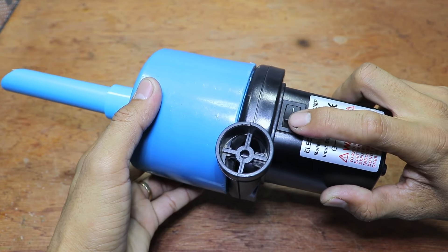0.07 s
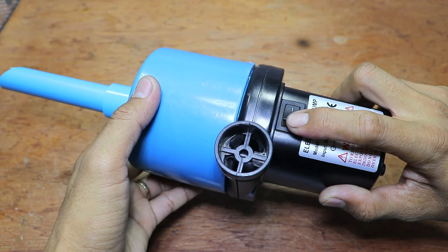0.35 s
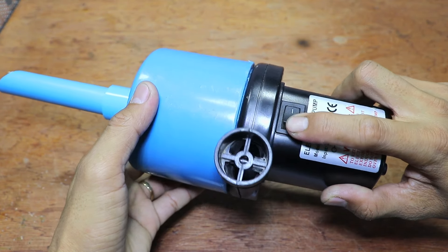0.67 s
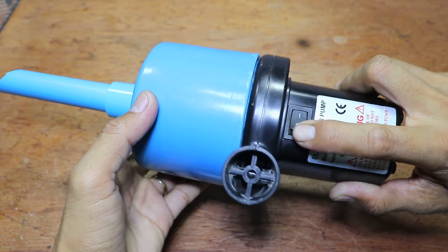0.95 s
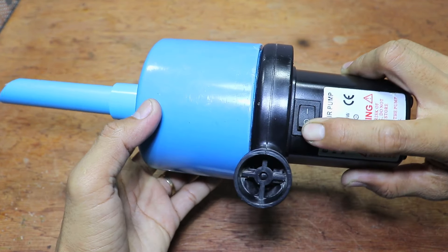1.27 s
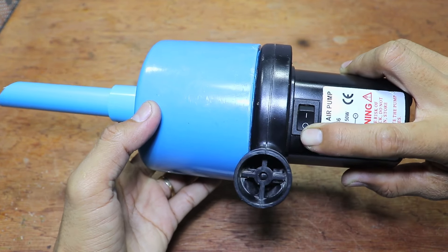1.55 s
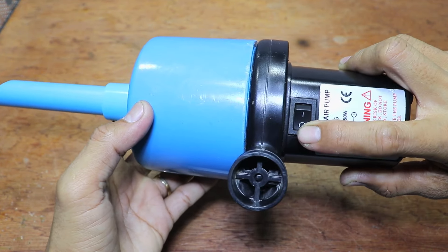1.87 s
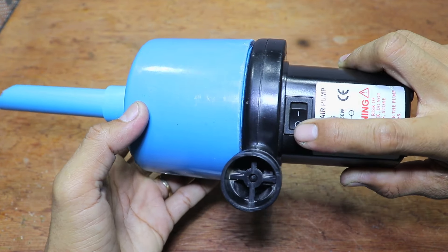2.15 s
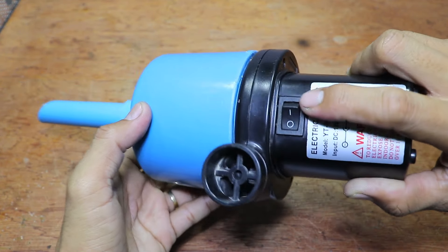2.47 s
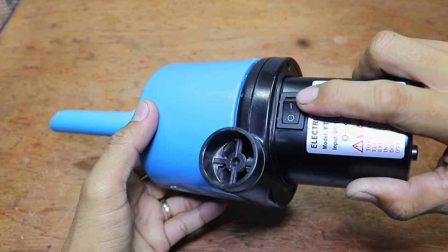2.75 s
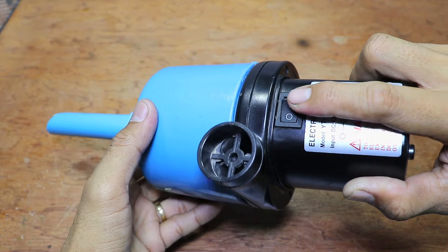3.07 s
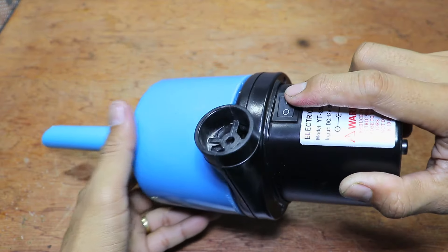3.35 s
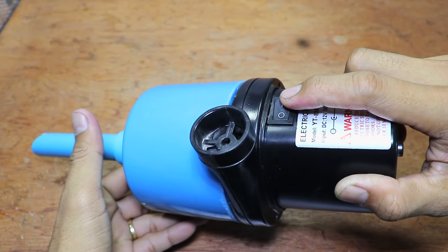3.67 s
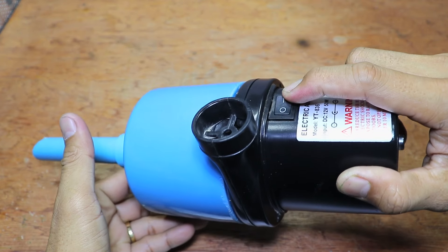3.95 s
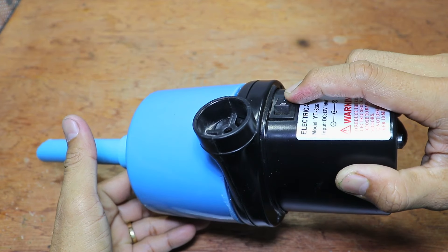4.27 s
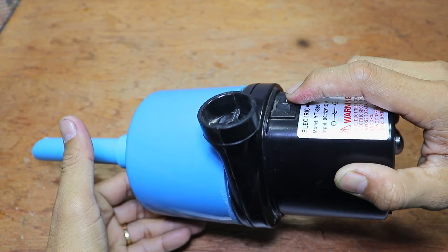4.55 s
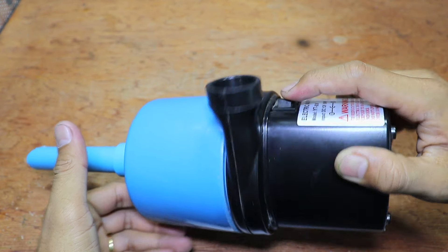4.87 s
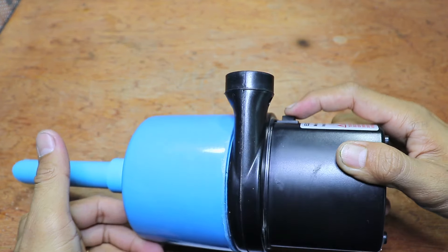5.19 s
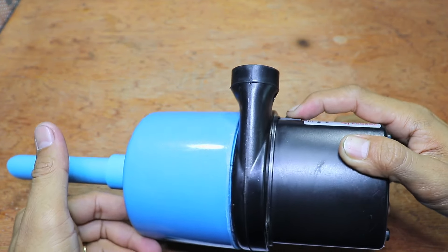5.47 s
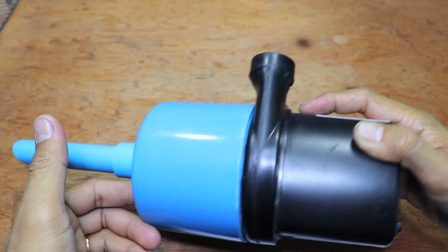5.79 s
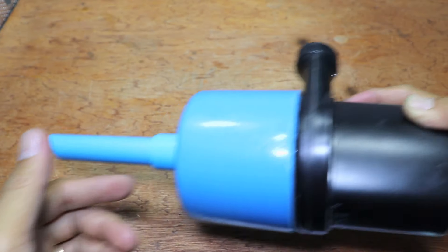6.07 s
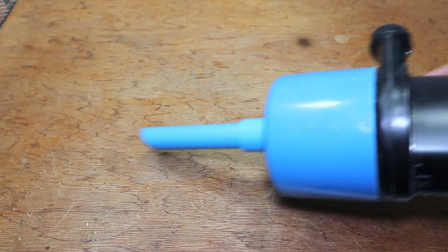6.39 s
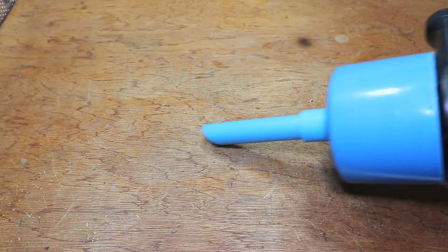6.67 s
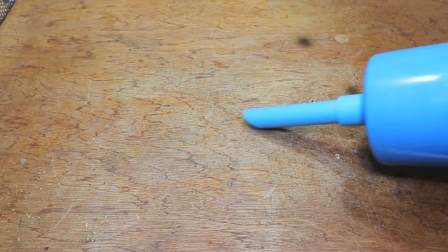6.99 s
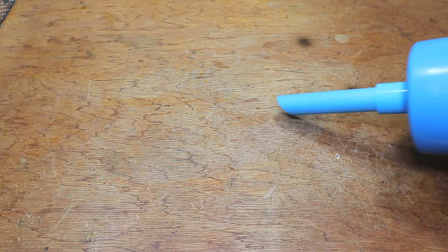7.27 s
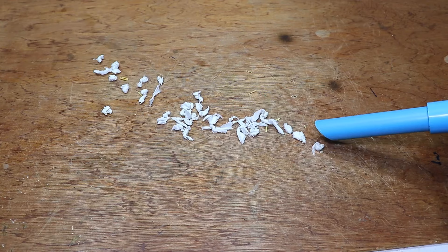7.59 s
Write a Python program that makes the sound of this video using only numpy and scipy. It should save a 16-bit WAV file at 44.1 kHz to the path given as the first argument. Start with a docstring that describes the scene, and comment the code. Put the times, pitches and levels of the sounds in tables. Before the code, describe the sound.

A small electric air pump whines and rushes, its air stream buffeting the microphone with distorted gusts. A switch clicks and the motor winds down, rubbing, rattling and ticking ever more slowly. Another click sends it back up to a high whine, then a third lets it coast down again. It drifts slightly right and starts up at the very end. The sound is close, in a quiet room.

```python
"""In a room, close above a wooden table, a small electric air pump is switched off and on twice.
At speed its impeller whines and rushes; coasting down, the rotor rubs and rattles once a turn.
One shaft speed drives these sounds. At first the air stream buffets the microphone, which overloads;
then the outlet is turned up, and at the end the pump moves off to the right."""
import sys
import numpy as np
from scipy import signal
from scipy.fft import rfft, irfft
from scipy.io import wavfile
from scipy.ndimage import uniform_filter1d, map_coordinates

SR = 44100
rng = np.random.default_rng(int(sys.argv[2]) if len(sys.argv) > 2 else 0)


def log_audio(samples):
    """Write samples as a 16-bit WAV file to the path given in sys.argv[1]."""
    # one column per channel
    frames = np.atleast_2d(samples).T
    # limit to full scale, then quantise
    limited = np.clip(frames, -1, 1)
    pcm = np.round(limited * 32767).astype(np.int16)
    wavfile.write(sys.argv[1], SR, pcm)


N = 340893
T = np.arange(N) / SR
FULL_HZ = 200  # full shaft speed


def undb(db):
    """Decibels to gain."""
    return 10 ** (np.asarray(db) / 20)


def curve(table, column=1):
    """Table column, interpolated over time."""
    rows = np.array(table, float)
    return np.interp(T, rows[:, 0], rows[:, column])


def swell(centre_s, sigma_s):
    """Gaussian envelope."""
    return np.exp(-.5 * ((T - centre_s) / sigma_s) ** 2)


def strike(start_s, decay_s):
    """Instant attack, exponential decay."""
    return (T >= start_s) * np.exp(-np.abs(T - start_s) / decay_s)


def walk(rate_hz):
    """Smoothed random steps, unit spread."""
    hold = int(SR / rate_hz)
    steps = np.repeat(rng.standard_normal(N // hold + 1), hold)
    smooth = uniform_filter1d(uniform_filter1d(steps, hold), hold)[:N]
    return smooth / smooth.std()


def stereo_noise(side_db):
    """White mid/side noise, unit power."""
    mid, side = rng.standard_normal((2, N))
    width = undb(side_db)
    return (mid + width * side * np.array([[1], [-1]])) / np.hypot(1, width)


def colour(x, spectrum, resonances=(), size=4096):
    """Minimum-phase filter, unit power gain: a spectrum plus resonances."""
    bins_hz = np.fft.rfftfreq(size, 1 / SR)
    hz, db = np.transpose(spectrum)
    db = np.interp(np.log(bins_hz + 1), np.log(hz), db)
    for centre_hz, width_hz, lift_db in resonances:
        db = db + lift_db / (1 + (2 * (bins_hz - centre_hz) / width_hz) ** 4)
    cepstrum = irfft(np.log(undb(db)))
    cepstrum[1:size // 2] *= 2
    cepstrum[size // 2 + 1:] = 0
    response = irfft(np.exp(rfft(cepstrum)))
    return signal.oaconvolve(np.atleast_2d(x), response[None] / np.linalg.norm(response))[:, :N]


def ring(x, centre_hz, width_hz):
    """Band-pass resonance, unit RMS."""
    edges_hz = [centre_hz - width_hz / 2, centre_hz + width_hz / 2]
    band = signal.sosfilt(signal.butter(2, edges_hz, "band", fs=SR, output="sos"), x)
    return band / band.std()


def speed_gain(hz, full_db, db_per_decade):
    """Power law of shaft speed."""
    return undb(full_db + db_per_decade * np.log10(hz / FULL_HZ))


# Background spectrum: (frequency [Hz], level [dB])
ROOM_SPECTRUM = [(25, -5), (100, -4), (250, 1.5), (500, 3), (1000, 8.5), (3000, -7), (8000, -37),
                 (16000, -42)]


def room_tone():
    """Faint steady noise of the room."""
    return colour(stereo_noise(side_db=-16), ROOM_SPECTRUM) * undb(-43)


def reflections(x, t60_s=.15, wet_db=-11):
    """Table and walls return a short tail, different on each side."""
    t = T[:SR // 3]
    tail = rng.standard_normal((2, len(t))) * np.exp(-np.log(1000) * t / t60_s) * (t > .002)
    tail /= np.linalg.norm(tail, axis=1, keepdims=True)
    return signal.oaconvolve(x.mean(axis=0)[None], tail, axes=1)[:, :N] * undb(wet_db)


# Aim of the stream at the microphone: (time [s], gain [dB])
STREAM_AIM = [(0, -6), (.5, -9.5), (.8, -1.5), (1.05, 4), (1.11, -21), (1.16, -0.5), (1.72, -1),
              (1.85, -7.5), (2.78, -1.5), (2.83, -30)]
# Single buffets: (time [s], level [dB], sigma [s])
WIND_BUFFETS = [(.012, -12, 0.013), (0.719, -1.5, 0.0037), (0.859, 1, 0.011), (0.911, 2.5, 0.013),
                (0.973, -0.5, 0.039), (1.144, -2, 0.0049), (1.194, 1.5, 0.017), (1.529, -7, 0.014),
                (1.682, -9, .006), (1.769, -13, 0.0051), (1.856, -13, 0.006), (2.137, -15, 0.0039),
                (2.244, -20.5, 0.008), (2.442, -21.5, 0.007), (2.526, -23, 0.0055), (2.691, -26, 0.0046),
                (2.786, -22, 0.0041)]
# Wind spectrum: (frequency [Hz], level [dB])
WIND_SPECTRUM = [(25, -24), (70, -16.5), (130, -6.5), (250, 0), (450, 1), (700, -3), (1100, -6),
                 (2000, -25.5), (5000, -62)]


def wind(hz):
    """Eddies hit the microphone, weaker as the impeller slows, until the stream is turned away."""
    eddies_db = 3.4 * walk(80) + walk(22)
    stream = speed_gain(hz, full_db=-13.5, db_per_decade=39) * undb(curve(STREAM_AIM) + eddies_db)
    stream *= T < STREAM_AIM[-1][0]
    buffets = sum(undb(db) * swell(time_s, sigma_s) for time_s, db, sigma_s in WIND_BUFFETS)
    return colour(stereo_noise(side_db=-4), WIND_SPECTRUM) * np.hypot(stream, buffets)


# Rocker throws: (time [s], power after [0/1], click level [dB], decay [s])
SWITCH_THROWS = [(1.488, 0, 4, 0.0058), (4.197, 1, 3, 0.0047), (5.545, 0, 2.5, 0.0051),
                 (7.428, 1, -14.5, 0.025)]
# Click spectrum: (frequency [Hz], level [dB])
CLICK_SPECTRUM = [(50, -16), (250, -27), (500, -21), (900, -3.5), (1700, 3), (2900, 1.5), (4400, 4.5),
                  (5600, 2.5), (7000, -2.5), (8700, -2), (12000, -14.5), (16000, -15)]


def switch_clicks():
    """The rocker snaps over; the shell rings briefly."""
    snaps = sum(undb(db) * strike(time_s, decay_s) for time_s, _, db, decay_s in SWITCH_THROWS)
    return colour(stereo_noise(side_db=-1) * snaps, CLICK_SPECTRUM)


def powered(clock_s):
    """1 while the switch is on, else 0."""
    on = np.ones(len(clock_s))
    for time_s, power, *_ in SWITCH_THROWS:
        on[clock_s >= time_s] = power
    return on


def shaft_speed(start_hz=162, spin_up_s=.234, air_drag=.006684, bearing_drag_hz_per_s=20.65):
    """Speed in Hz: power pulls the rotor to full speed; without it, air and bearings brake it."""
    step_s = .001
    clock_s = np.arange(0, T[-1], step_s)
    hz, speeds = start_hz, []
    for on in powered(clock_s):
        hz_per_s = (FULL_HZ - hz) / spin_up_s if on else -(air_drag * hz ** 2 + bearing_drag_hz_per_s)
        hz += hz_per_s * step_s
        speeds.append(hz)
    return np.interp(T, clock_s, speeds)


def torque_gain(hz, at_rest_db=4.5):
    """The motor labours while pulling the rotor up to speed."""
    on = uniform_filter1d(powered(T), SR // 100)
    return undb(at_rest_db * on * (1 - hz / FULL_HZ) ** 2)


# Outlet direction: (time [s], tilt [0-1])
OUTLET_TILT = [(3.5, 0.09), (4.7, 0.98)]


def tilt():
    """0 = outlet facing the microphone, 1 = pointing up."""
    return curve(OUTLET_TILT)


# Shell modes: (frequency [Hz], width [Hz], lift facing [dB], lift tilted up [dB])
HOUSING_MODES = [(588, 28, 4, 6), (678, 17, 5, 3), (770, 205, -0.5, 5), (1020, 170, -3.5, -0.5),
                 (1197, 170, 2.5, 7.5), (1222, 45, -4, -7), (1410, 120, -4, 1), (1666, 90, 4, 1),
                 (1870, 124, 3.5, 5), (2000, 120, -1.5, 4.5), (2168, 96, 7, 8), (2350, 105, 6, 0.5),
                 (2750, 120, 0.5, -5), (3218, 120, 6, 4.5), (3687, 186, 8.5, 4), (4110, 360, 7.5, 3),
                 (4444, 170, -3.5, -3.5), (4520, 110, 5.5, 6), (5350, 760, 5, 2.5),
                 (6600, 1300, -2.5, -3.5), (6810, 120, -3, 7.5), (7870, 130, 2, 7), (8770, 1050, 3, 3)]


def housing(x, spectrum):
    """The plastic shell's resonances change strength as the pump tilts."""
    modes, up = np.array(HOUSING_MODES), tilt()
    return (1 - up) * colour(x, spectrum, modes[:, :3]) + up * colour(x, spectrum, modes[:, [0, 1, 3]])


def hiss_gain(hz):
    """Flow hiss rises steeply with speed; when slow, only the rub's own hiss is left."""
    flow = speed_gain(hz, full_db=-16, db_per_decade=71) * undb(-3.5 * tilt())
    return np.hypot(flow, rub_gain(hz) * undb(-26))


# Turbulence spectrum: (frequency [Hz], level [dB])
HISS_SPECTRUM = [(40, -46), (150, -16.5), (400, 4), (900, -3.5), (2000, -2), (3300, 0.5), (4500, -1),
                 (6000, -1), (8000, -6), (10000, -7.5), (13000, -16), (15500, -26)]


def air_hiss(hz, throb):
    """Turbulence hisses through the housing."""
    stream = stereo_noise(side_db=-8) * undb(.61 * walk(60)) * hz / (hz + 14)
    return housing(stream * throb, HISS_SPECTRUM) * hiss_gain(hz) * undb(8.5)


# Roar spectrum: (frequency [Hz], level [dB])
ROAR_SPECTRUM = [(25, -34), (90, -21), (130, -25), (180, 4.5), (270, -2), (315, -23.5), (380, 13),
                 (450, -2), (510, 11), (700, 0), (1100, 0.5), (2200, -39), (2600, -24), (6000, -52)]
# Outlet air resonance: (frequency [Hz], width [Hz])
OUTLET_MODE = (234, 135)


def outlet(hz, hum_from_hz=74, facing_db=-14.5):
    """Air in the outlet hums hollowly when slow and roars when fast."""
    stream = stereo_noise(side_db=-74) * undb(walk(30))
    roar = colour(stream, ROAR_SPECTRUM) * speed_gain(hz, full_db=-20, db_per_decade=41.5)
    filled = 1 / (1 + (hum_from_hz / hz) ** 3)
    hum = ring(stereo_noise(side_db=-29), *OUTLET_MODE) * undb(-30) * filled
    return (roar + hum) * torque_gain(hz) * undb(facing_db * (1 - tilt()))


# Hard catches of the slow rotor: (time [s], level [dB])
CATCHES = [(3.323, -23), (3.349, -13), (3.375, -25), (3.402, -20), (3.536, -17), (3.566, -17), (3.782, -19),
           (3.821, -26), (3.859, -29), (3.902, -32), (3.976, -27), (7.021, -22)]
# Tick spectrum: (frequency [Hz], level [dB])
TICK_SPECTRUM = [(100, -26), (500, -26), (1000, -1), (3300, 8), (5500, 1), (7000, -4), (9500, -9),
                 (12000, -21), (15500, -41)]


def brush_ticks(turns, hz, below_hz=45, decay_s=.0022):
    """At low speed the brushes snap over the commutator twice a turn; some turns catch harder."""
    half_turn = (2 * turns).astype(int)
    force = undb(3.5 * rng.standard_normal(half_turn[-1] + 1))[half_turn]
    age_s = (2 * turns % 1) / (2 * hz)
    gain = hiss_gain(hz) * undb(33) / (1 + (hz / below_hz) ** 4)
    snaps = force * np.exp(-age_s / decay_s) * gain
    snaps += sum(undb(db) * strike(time_s, decay_s=.0028) for time_s, db in CATCHES)
    return housing(snaps * stereo_noise(side_db=5), TICK_SPECTRUM)


# Motor harmonics: (order [per turn], relative level driven [dB], coasting [dB])
MOTOR_ORDERS = [(3, -17, -20), (5, -14, -18), (7, -21, -22), (8, -13, -23), (9, -16.5, -15), (10, -22, -19),
                (11, -24, -15), (12, -26, -18), (13, -30, -19), (14, -26, -17), (15, -28, -20),
                (16, -30, -15.5), (18, -24, -17), (20, -26, -17), (24, -23, -17), (26, -21, -19)]


def motor_tones(turns, hz, swell_db=3):
    """Multiples of the shaft rate swell and fade; the upper ones stand out when coasting."""
    on = uniform_filter1d(powered(T), SR // 12)
    shaken_turns = turns + .0035 * walk(45)
    tones = 0
    for order, driven_db, coasting_db in MOTOR_ORDERS:
        radiated = 1 / (1 + (600 / (order * hz)) ** 2)
        phase = 2 * np.pi * (order * shaken_turns + rng.random())
        level_db = on * driven_db + (1 - on) * coasting_db + swell_db * walk(9)
        tones += np.sin(phase) * radiated * undb(level_db)
    return tones * undb(-5)


# Loose-rotor spells: (start [s], end [s], extra rub [dB], extra scrape share [0-1])
RATTLE_SPELLS = [(2.003, 2.45, -0.5, 0.08), (2.684, 3.418, 0, .17), (3.646, 3.88, 0.5, .15),
                 (7.013, 7.417, 2, 0.32)]


def rattle(column):
    """Extra rub or scrape while the loose rotor rattles, 0 between spells."""
    spells = sum(float(row[column]) * ((T > row[0]) & (T < row[1])) for row in RATTLE_SPELLS)
    return uniform_filter1d(spells, SR // 100)


def contact_pressure(turns, hz, slow_share=.41, fast_share=.23, crossover_hz=77):
    """The rotor presses hardest on one side: one scrape a turn, strongest when slow."""
    slow = 1 / (1 + (hz / crossover_hz) ** 6)
    share = fast_share + (slow_share - fast_share) * slow + rattle(column=3)
    scrape = np.exp(2.1 * np.cos(2 * np.pi * turns))
    return np.sqrt(1 - share + share * scrape / scrape.mean())


def rough_spots(turns, hz, count=90, fade_hz=160):
    """The same rough spots tick past on every turn; the pattern fades at speed."""
    angle_turns, height = rng.random(count), rng.standard_normal(count)
    passes = np.arange(int(turns[-1]))[:, None] + angle_turns
    force = height * undb(.53 * rng.standard_normal(passes.shape))
    onsets = np.interp(passes, turns, np.arange(N)).astype(int)
    ticks = np.bincount(onsets.ravel(), force.ravel(), N)
    running_rms = np.sqrt(uniform_filter1d(ticks ** 2, SR // 8) + 1e-4)
    return ticks / running_rms / (1 + (hz / fade_hz) ** 6)


# Rub spectrum: (frequency [Hz], level [dB])
RUB_SPECTRUM = [(60, -28), (150, -32), (250, -12.5), (350, -20), (560, -15.5), (680, -5), (1000, -3),
                (1500, 0), (2200, -5), (3200, -4.5), (4300, -8.5), (6000, -13), (9000, -23), (15000, -34.5)]
# Ringing bands; the bright one near 5.3 kHz swells as the whine's octave rises during spin-up:
# (time [s], sigma [s], extra rub [dB], band centre [Hz], band width [Hz], band level [dB])
BAND_SWELLS = [(.3, 0.39, -.5, 2325, 130, -25), (1.446, 0.21, 3, 4070, 170, -18),
               (2.15, 0.19, 0.5, 1680, 153, -30), (2.56, 0.035, 6, 4220, 300, -32),
               (2.75, 0.17, 0, 1750, 150, -38), (3.122, 0.16, 4, 3215, 220, -32.5),
               (3.612, 0.25, 4, 1270, 330, -35.5), (4.378, 0.096, 1.5, 1480, 796, -22),
               (4.687, 0.18, 1.5, 5330, 700, -18.5), (5.36, 0.34, 2, 2218, 140, -17),
               (6.594, 0.12, 5.5, 4170, 350, -29.5), (7.22, .2, 3.5, 4060, 500, -29),
               (7.73, 0.056, 2.5, 2100, 280, -19)]


def rotor_rub(turns, hz):
    """The rotor ticks and rasps against the housing; narrow bands swell and ring over it."""
    pressure = contact_pressure(turns, hz)
    ticks = rough_spots(turns, hz) * undb(-6)
    rasp = stereo_noise(side_db=-3.5) * undb(-3)
    contact = ticks + rasp + motor_tones(turns, hz)
    rub = housing(contact * pressure, RUB_SPECTRUM) * rub_gain(hz) * undb(4)
    drive = stereo_noise(side_db=-18) * pressure
    for time_s, sigma_s, _, centre_hz, width_hz, db in BAND_SWELLS:
        rub += ring(drive, centre_hz, width_hz) * undb(db) * swell(time_s, sigma_s)
    return rub


def rub_gain(hz, stall_hz=16.4):
    """The rub follows speed, torque, tilt, band swells and rattling; it dies near a stall."""
    coasting = 1 - uniform_filter1d(powered(T), SR // 100)
    stall = 1 + coasting * (stall_hz / hz) ** 4
    swell_db = sum(db * swell(time_s, sigma_s) for time_s, sigma_s, db, *_ in BAND_SWELLS)
    boost = undb(2 * tilt() + swell_db + rattle(column=2)) * torque_gain(hz)
    return speed_gain(hz, full_db=-19, db_per_decade=23) * boost / stall


# Duct air resonances: (frequency [Hz], width [Hz], lift [dB])
DUCT_MODES = [(1710, 230, 15), (3250, 237, 8.5), (3640, 350, 12), (5330, 750, 18)]


def duct_gain(pitch_hz):
    """A tone swells as it sweeps through the duct's resonances."""
    return undb(sum(lift_db / (1 + (2 * (pitch_hz - centre_hz) / width_hz) ** 2)
                    for centre_hz, width_hz, lift_db in DUCT_MODES))


# Blade tone beaming past the microphone as the pump is turned: (time [s], gain [dB])
WHINE_BEAM = [(0, -3), (.5, -1), (.82, 5), (.95, 2.5), (1.48, 0), (1.6, -2), (2, -5), (4.5, -8), (5.05, 6),
              (5.3, -5), (5.52, -8), (5.62, -6), (6.1, -21), (7.73, -1)]


def impeller_whine(turns, hz, tone_order=16, octave_db=-16):
    """The eight blades drive a fluttering tone at twice their passing rate, and its octave."""
    phase = tone_order * 2 * np.pi * turns + .14 * walk(70)
    phase = phase + np.array([[0], [.5]])  # reaches the two capsules out of step
    flutter_db = walk(9) + 1.5 * walk(35) + walk(160)
    tone = np.sin(phase) * duct_gain(tone_order * hz)
    octave = np.sin(2 * phase) * duct_gain(2 * tone_order * hz) * undb(octave_db)
    gain = speed_gain(hz, full_db=-18.5, db_per_decade=55) * undb(curve(WHINE_BEAM) + flutter_db)
    return np.sqrt(2) * (tone + octave) * gain


# Pump position: (time [s], left minus right [dB], gain [dB])
PUMP_PATH = [(0, -.6, 0), (5.6, -.4, 0), (6.2, -1.1, -2.2), (7.1, -3.3, -3.8), (7.5, -3.3, -5),
             (7.73, -3.2, -1.5)]


def move_right(pump):
    """Drawn to the right, the pump reaches the left capsule later and weaker."""
    pan_db = curve(PUMP_PATH)
    delay_samples = np.clip(-2 * pan_db - 1.5, 0, 3)
    left = map_coordinates(pump[0], [np.arange(N) - delay_samples], order=3, mode="nearest")
    gain_db = curve(PUMP_PATH, column=2) + np.array([pan_db, -pan_db]) / 2
    return np.array([left, pump[1]]) * undb(gain_db)


def scene():
    """The pump and its reflections, wind on the microphone, room tone."""
    hz = shaft_speed()
    turns = np.cumsum(hz) / SR
    turns -= np.interp(CATCHES[0][0], T, turns) % 1  # scrape at the angle of the first catch
    throb_depth = 1 / (1 + (hz / 125) ** 8)  # hiss and whine throb below full speed
    throb = contact_pressure(turns, hz) ** throb_depth
    body = rotor_rub(turns, hz) + brush_ticks(turns, hz)
    body += air_hiss(hz, throb) + outlet(hz) + switch_clicks()
    whine = impeller_whine(turns, hz) * throb
    pump = body + whine + reflections(body + .5 * whine)
    return move_right(pump) + wind(hz) + room_tone()


def record(dry, cutoff_hz=15700):
    """The input stage soft-clips the loudest peaks; a steep low-pass cuts the top."""
    clipped = dry / (1 + np.abs(dry) ** 8) ** (1 / 8)
    return signal.sosfilt(signal.ellip(10, .1, 70, cutoff_hz, fs=SR, output="sos"), clipped)


dry = scene()
out = record(dry)
log_audio(out)
```